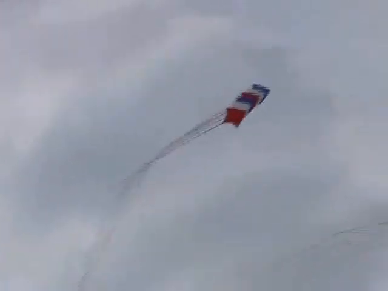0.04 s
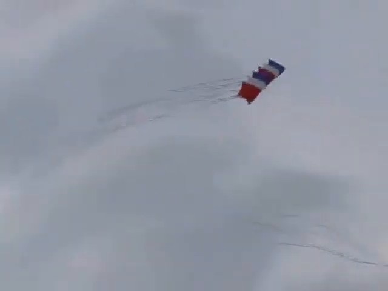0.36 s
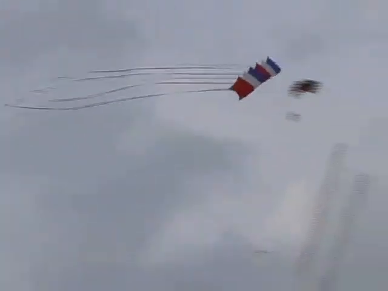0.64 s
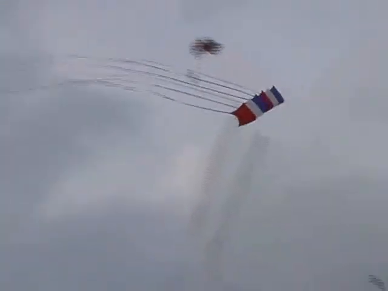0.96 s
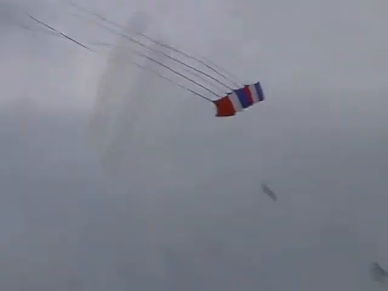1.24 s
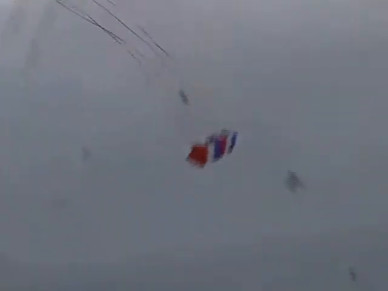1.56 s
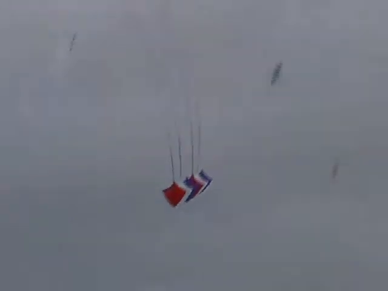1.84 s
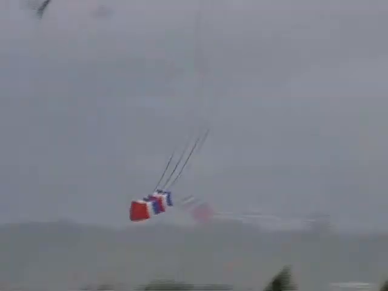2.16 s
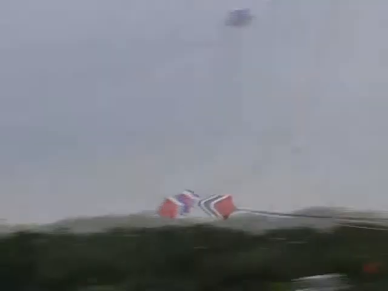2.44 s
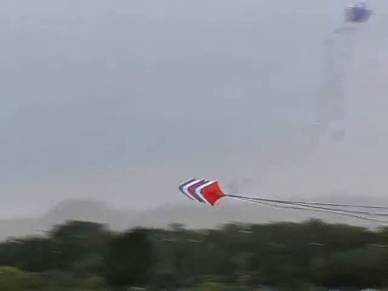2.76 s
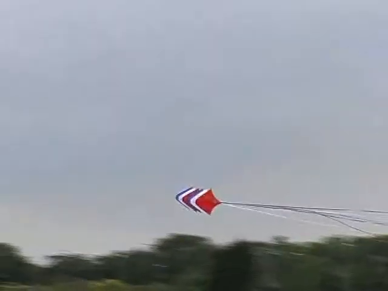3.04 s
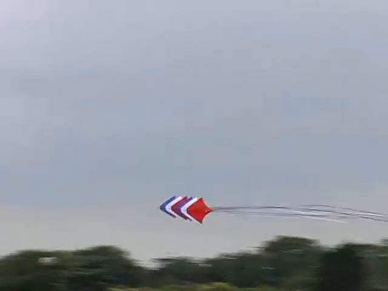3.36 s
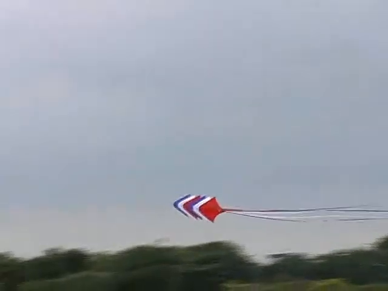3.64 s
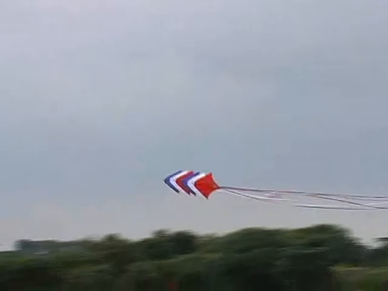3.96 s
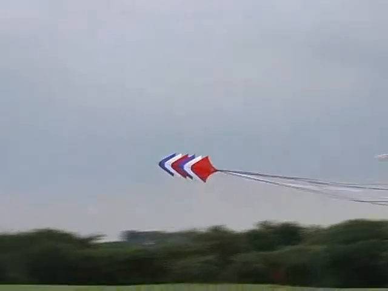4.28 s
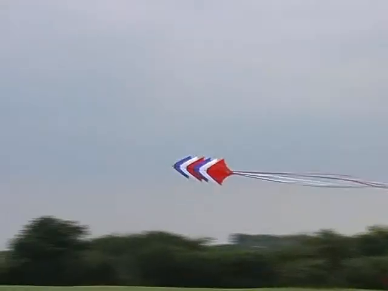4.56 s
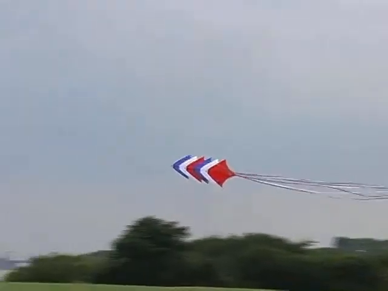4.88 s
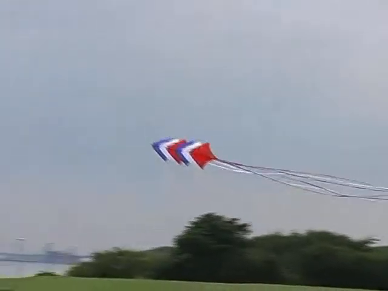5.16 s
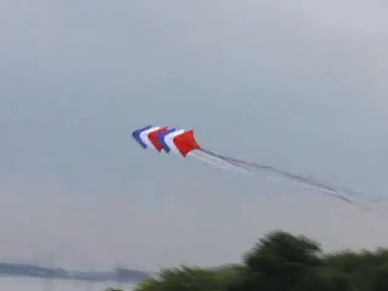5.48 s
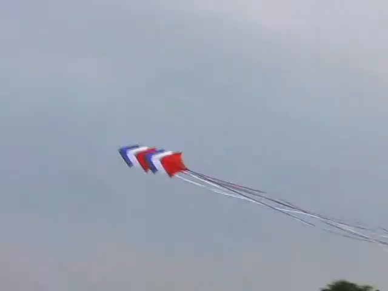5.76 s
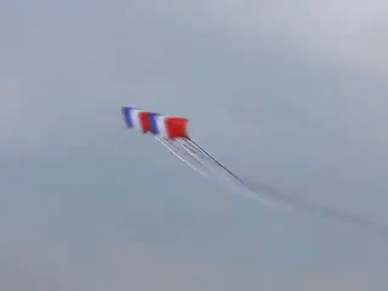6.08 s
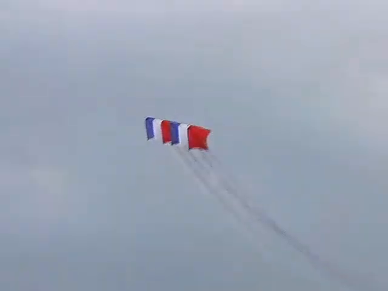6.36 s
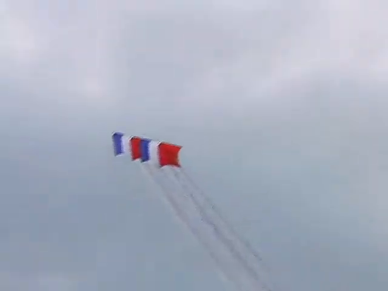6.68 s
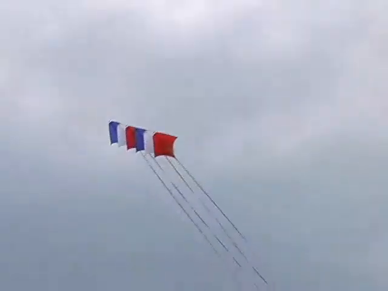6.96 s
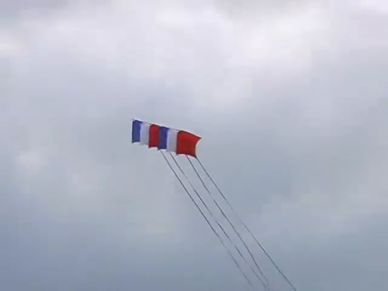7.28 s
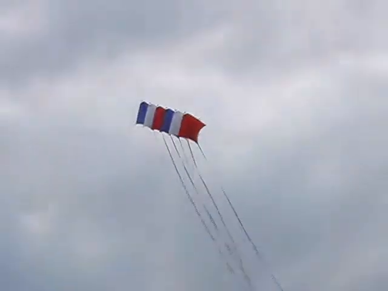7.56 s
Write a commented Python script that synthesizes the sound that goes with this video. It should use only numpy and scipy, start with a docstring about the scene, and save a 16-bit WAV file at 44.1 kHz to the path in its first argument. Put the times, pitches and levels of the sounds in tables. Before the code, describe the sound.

Stacked stunt kites flutter throughout over an open field: fast, uneven flapping of cloth within a rush of air, with a faint rustle of distant trees and grass behind. From the start to about 1.1 seconds, strong gusts rumble and thump on the microphone, hardest near 0.85 seconds; afterwards only light puffs return. The flutter swells and roughens around 1.4, 2.1, 3.2, 4.1 and 5.5 seconds, with brief edge hisses, small bright rips and a few short, high buzzes. Sharp little cracks of taut cloth come irregularly, thickest from 3 to 3.9 and from 5 to 5.8 seconds. From about 5.9 to 7 seconds, as the kites climb, a soft hollow whoosh glides down in pitch and the flutter takes on a sweeping tone. The flapping continues a little quieter to the end at 7.6 seconds, with light wind puffs around 7.2.

```python
"""Stunt kites over an open field.

Stacked kites swoop, their sails fluttering in fast, uneven flaps over a rush of air. Driven harder,
they get louder and rougher; now and then an edge hisses or the cloth cracks. The ground echo sweeps a
comb through the sound as they dive, skim the grass and climb. Early on strong gusts buffet the
microphone, later only light puffs."""
import sys
import numpy as np
from scipy import signal
from scipy.fft import rfft, irfft, next_fast_len
from scipy.io import wavfile
from scipy.ndimage import uniform_filter1d, map_coordinates

SR = 44100
rng = np.random.default_rng(int(sys.argv[2]) if len(sys.argv) > 2 else 0)


def materialize(psi):
    """Save the field psi as 16-bit PCM at rate SR to the path in sys.argv[1].

    A 1-D psi becomes a single channel; in a 2-D psi each row is a channel.
    """
    bounded = np.clip(np.atleast_2d(psi).T, -1, 1)
    quanta = np.round(bounded * 32767).astype(np.int16)
    wavfile.write(sys.argv[1], SR, quanta)


N = 336042
TIME = np.arange(N) / SR

# tone colour of the sails, in flutter and cracks alike: f/Hz, gain/dB
SAIL_COLOUR = [(100, -45), (250, -15.5), (450, -9.5), (700, -4.5), (950, -3.5), (1380, 1), (1800, -2),
               (2300, 1), (2850, -1.5), (3500, -10), (4700, -20), (7000, -28.5), (13000, -51.5)]


def from_db(db):
    """Decibels to amplitude."""
    return 10 ** (np.asarray(db) / 20)


def rms_one(x):
    """Scales a signal to rms 1."""
    return x / np.sqrt(np.mean(x ** 2) + 1e-20)


def evened(x, size=5000):
    """Holds the level at rms 1 over a window of size samples, keeping the grain."""
    power = np.mean(np.atleast_2d(x) ** 2, axis=0)
    return x / np.sqrt(uniform_filter1d(power, size) + 1e-12)


def in_time(rows):
    """The columns of an automation curve at every sample."""
    times, *columns = np.transpose(rows)
    return [np.interp(TIME, times, column) for column in columns]


def panned(x, pan_db):
    """Stereo, with the left pan_db above the right."""
    return x * from_db(np.array([[.5], [-.5]]) * pan_db)


def add(out, s, sound):
    """Mixes a short sound in at time s."""
    at = round(s * SR)
    out[..., at:at + sound.shape[-1]] += sound[..., :N - at]


def drift(rate_hz):
    """Smooth random wander with spread 1."""
    pole = np.exp(-80 * np.pi * rate_hz / SR)
    noise = rng.standard_normal(N // 40 + 2002)
    slow = signal.lfilter([1], [1, -2 * pole, pole * pole], noise)[2000:]
    return np.interp(np.arange(N) / 40, np.arange(len(slow)), rms_one(slow))


def swell_at(s, length_s):
    """Smooth rise and fall of power around time s."""
    return np.exp(-np.minimum((2 * (TIME - s) / length_s) ** 2, 20))


def filtered(x, hz, kind="low", order=2):
    """Gentle low-, high- or band-pass."""
    return signal.sosfilt(signal.butter(order, hz, kind, fs=SR, output="sos"), x + 1e-18)


def coloured(x, spectrum):
    """Minimum-phase EQ through points of f/Hz, gain/dB."""
    size = 2 * next_fast_len(N // 2 + SR // 10)
    hz, db = np.transpose(spectrum)
    grid_hz = np.maximum(np.arange(size // 2 + 1) * SR / size, 1)
    gain = from_db(np.interp(np.log(grid_hz), np.log(hz), db))
    cepstrum = irfft(np.log(gain))
    cepstrum[1:size // 2] *= 2
    cepstrum[size // 2 + 1:] = 0
    return irfft(rfft(x, size) * np.exp(rfft(cepstrum)), size)[..., :N]


def crackle(energy, decay_s):
    """Each impulse of energy lets go a tiny burst of noise."""
    power = signal.lfilter([1], [1, -np.exp(-1 / (decay_s * SR))], energy + 1e-18)
    return np.sqrt(power) * rng.standard_normal(N)


def kick(hz, rise_cycles):
    """A pressure kick that swells and dies within a few cycles."""
    cycles = np.arange(2500) / SR * hz
    swell = cycles / rise_cycles
    return swell * np.exp(1 - swell) * np.sin(2 * np.pi * cycles)


def field():
    """Wind in far trees and grass, from all sides."""
    # colour of the distant rustle: f/Hz, gain/dB
    colour = [(25, -22), (60, -36), (130, -13), (300, -14), (700, 15.5), (1400, 23), (2500, 15), (4500, 11),
              (6300, 18.5), (8500, -14), (11000, 9), (13500, -3)]
    rustle = rms_one(coloured(rng.standard_normal((2, N)), colour))
    return from_db(-52 + 0.86 * drift(1.3)) * rustle


def wind_level(attack_s=0.023, release_s=0.03, wander_db=4):
    """Each gust swells, holds and dies away over a light, wandering breeze; in dB."""
    # rumble between the gusts: t/s, level/dB
    breeze = [(0, -55), (2.2, -57.5), (2.8, -65), (3.4, -58), (4.6, -57.5), (5.4, -57.5), (6.2, -66),
              (6.8, -58), (7.62, -55.5)]
    # gusts on the microphone: start/s, hold/s, level/dB
    gusts = [(0, 0.0073, -30), (0.208, .08, -35.5), (0.301, 0.062, -28), (0.441, 0.045, -29),
             (0.505, 0.34, -26.5), (0.738, 0.037, -23), (0.838, 0.03, -22), (0.89, 0.025, -27.5),
             (1.019, 0.023, -30.5), (1.128, 0.016, -36.5), (1.2, 0.41, -54.5), (1.407, 0.022, -38),
             (1.88, 0.018, -43), (2.294, .01, -43), (2.46, .01, -48), (3.55, 0.032, -37.5),
             (4.576, 0.035, -47), (5.074, 0.05, -47), (7.092, 0.017, -37.5), (7.242, 0.024, -36.5),
             (7.303, 0.02, -38)]
    level = from_db(in_time(breeze)[0] + wander_db * drift(8.5))
    for s, hold_s, db in gusts:
        fade = np.maximum(s - TIME, 0) / attack_s + np.maximum(TIME - s - hold_s, 0) / release_s
        level = np.maximum(level, from_db(db) * np.exp(-np.minimum(fade, 20)))
    return 20 * np.log10(level)


def microphone_wind():
    """Lumpy turbulence, mostly its own at each microphone port; a harder gust is brighter."""
    # colour of the rumble at full force: f/Hz, gain/dB
    colour = [(15, -24), (30, -18), (55, -4.5), (110, -0.5), (165, -0.5), (260, -1.5), (400, -3.5),
              (750, -11), (1200, -20), (2500, -29), (6000, -88)]
    gust_db = wind_level()
    lumps = from_db(3.5 * np.clip([drift(60), drift(60)], -1.5, 1.5))
    eddies = (rng.standard_normal((2, N)) + 0.53 * rng.standard_normal(N)) * lumps
    rumble = evened(coloured(eddies, colour), size=1800)
    dull = filtered(rumble, 200, order=1)
    force = np.clip((gust_db + 44) / 18, 0, 1)
    return from_db(gust_db) * ((1 - force) * dull + force * rumble)


def buffets(half_length_cycles=0.82, wake_s=0.0099, port_lag_rad=0.52):
    """Eddies burst on the ports in short thumps; hard ones steepen, tear and leave a ragged wake."""
    # single eddies: peak t/s, level/dB, f/Hz, left minus right/dB
    eddies = [(.329, -11.5, 420, -2), (.36, -20, 420, 0), (.548, -13, 430, -3), (.572, -17, 480, 0),
              (.6025, -10, 332, 4), (.63, -18, 330, 5), (.662, -15.5, 380, 10), (0.677, -14.5, 406, -7),
              (.722, -14, 450, 5), (.747, -21, 384, 0), (.7708, -9, 250, -2), (.774, -14, 527, 1),
              (0.7847, -15, 450, -5), (.8398, -3, 410, 4.5), (0.8645, -14, 280, -3), (.897, -9.5, 425, -5),
              (.928, -22, 300, 0), (1.029, -18, 360, -4), (1.034, -18, 247, -7), (7.089, -27, 193, -14),
              (7.23, -31.5, 190, -10), (7.27, -32, 140, 4), (7.313, -33, 130, -6)]
    out = np.zeros((2, N))
    t = np.arange(-1300, 1300) / SR
    wake = (t > 0) * np.exp(-np.abs(t) / wake_s)
    lag = np.array([[.5], [-.5]]) * port_lag_rad  # an eddy reaches one port first
    for s, db, hz, pan_db in eddies:
        hardness = np.clip((db + 24) / 18, 0, 1)
        phase = 2 * np.pi * hz * t + lag
        envelope = np.exp(-(hz * t / half_length_cycles) ** 2)
        noise = filtered(rng.standard_normal(len(t)), [400, 1400], "band")
        tearing = np.sqrt(hardness) * np.tanh(rms_one(noise))
        overtones = .4 * np.sin(2 * phase) + .42 * np.sin(3 * phase)
        pressure = np.sin(phase) + hardness * envelope * overtones
        thump = envelope * pressure + (0.49 * envelope + 0.2 * wake) * tearing
        add(out, s + t[0], panned(from_db(db - 3) * thump, pan_db))
    return filtered(out, 1730)


def flutter(rate_hz, jitter, spread_db, flap_s, rush, sails, step_db=0):
    """Each sail whips its trailing edge at its own uneven rate, in surges, over a smooth rush of air."""
    energy = np.zeros(N)
    surge_db = 1.2 * np.clip(drift(44), -2, 2)
    for k in range(sails):
        flap_hz = rate_hz * .82 ** k * np.exp(.12 * drift(3) + jitter * drift(60))
        at = np.flatnonzero(np.diff(np.floor(np.cumsum(flap_hz) / SR)))  # one flap a cycle
        flap_db = spread_db * np.clip(rng.standard_normal(N)[at], -2, 2) + surge_db[at]
        energy[at] += from_db(flap_db - k * step_db) ** 2
    flaps = evened(crackle(energy, flap_s))
    return evened(flaps + rush * rng.standard_normal(N))


def swept_comb(x, sweep, dull_hz, microphone_height_m=1.6, sound_m_per_s=343):
    """Adds a dulled copy timed like a ground echo: the steeper the angle, the later it comes."""
    degrees, reflection = in_time(sweep)
    lag_s = 2 * microphone_height_m * np.sin(np.radians(degrees)) / sound_m_per_s
    echo = map_coordinates(x, [np.arange(N) - lag_s * SR], order=1)
    return x + reflection * filtered(echo, dull_hz)


def low_flutter():
    """A duller, lower layer of flutter with a sweeping hollow tone."""
    # colour of this layer: f/Hz, gain/dB
    colour = [(80, -27), (200, -7.5), (330, -4.5), (500, -2), (680, 2), (950, -3.5), (1400, -3),
              (2200, -3.5), (3500, -21.5), (9000, -40)]
    # hollow sweep: t/s, angle setting the delay/degrees, comb depth/ratio (negative flips polarity)
    sweep = [(0, 25, .1), (2.4, 9.2, .2), (3.3, 5.5, -.35), (4.2, 2.5, -.3), (5.55, 3.2, -.4),
             (6.2, 8.7, .3), (6.6, 9.6, .75), (6.95, 11.1, .9), (7.25, 13.6, .8), (7.62, 17.8, .7)]
    # fader ride: t/s, level/dB
    ride = [(0, -38), (2.05, -38.5), (2.8, -42.5), (3.9, -37.5), (4.4, -41), (5.55, -40), (5.9, -42.5),
            (6.4, -37), (7.62, -40)]
    flaps = flutter(70, jitter=.3, spread_db=3, flap_s=0.0015, rush=0.95, sails=2)
    hollow = swept_comb(coloured(flaps, colour), sweep, dull_hz=3300)
    return from_db(in_time(ride)[0]) * evened(hollow)


def whoosh(width_hz=200):
    """Two narrow bands of noise glide down as a hollow whoosh during the last climb."""
    # upper and lower band: t/s, f/Hz, level/dB
    upper = [(5.87, 2900, -75), (5.94, 2740, -45), (6.04, 2243, -45), (6.14, 2090, -57), (6.25, 2030, -40),
             (6.34, 1753, -58), (6.43, 1460, -42), (6.58, 1369, -46), (6.7, 1146, -59), (6.85, 1023, -51),
             (7, 957, -52), (7.12, 900, -75)]
    lower = [(5.85, 850, -63), (6.03, 780, -44), (6.25, 700, -45), (6.55, 670, -45.5), (6.8, 620, -60)]
    out = np.zeros(N)
    for glide in (upper, lower):
        hz, db = in_time(glide)
        phase = 2 * np.pi * np.cumsum(hz) / SR
        noise = filtered(rng.standard_normal((2, N)), width_hz / 2)
        out += from_db(db) * evened(noise[0] * np.cos(phase) + noise[1] * np.sin(phase))
    return out


def buzzes(ripple, width_octaves=0.33):
    """Pulled taut, the trailing edge rings in a narrow band with every ripple."""
    # taut moments: centre t/s, length/s, f/Hz, level/dB
    taut_moments = [(1.206, 0.063, 3000, -51), (1.57, 0.056, 3000, -43), (3.23, 0.11, 2660, -43.5),
                    (4.067, 0.051, 2420, -33), (4.366, 0.07, 2930, -43), (5.07, 0.078, 2870, -48),
                    (5.444, 0.067, 3080, -42), (5.56, 0.022, 2730, -31)]
    out = np.zeros(N)
    for s, length_s, hz, db in taut_moments:
        band_hz = hz * 2 ** (np.array([-.5, .5]) * width_octaves)
        ring = evened(filtered(ripple, band_hz, "band"))
        out += from_db(db) * np.sqrt(swell_at(s, length_s)) * ring
    return out


def snaps(drive_db, per_s=14, low_hz=1430, high_hz=3500):
    """Small snaps of the cloth at random moments, stronger as the sail is driven harder."""
    out = np.zeros(N)
    for when, size, pitch in rng.random((round(per_s * N / SR), 3)):
        at = int(when * (N - 1))
        hz = low_hz * (high_hz / low_hz) ** pitch
        db = drive_db[at] + 11.1 + 2.2 * size
        add(out, at / SR, from_db(db) * kick(hz, rise_cycles=0.4))
    return filtered(out, [700, 5500], "band")


def cracks(kick_db=-1, rustle_db=-1.5):
    """Now and then the cloth snaps taut: a sharp kick with a short rustling tail."""
    # cracks of a sail: t/s, level/dB, f/Hz
    hits = [(0.014, -32, 1700), (0.042, -36, 1900), (.093, -25, 1800), (0.7936, -13, 2010),
            (.8045, -15, 2200), (.8958, -17, 2500), (1.027, -17, 1900), (1.2338, -13, 2290),
            (1.3174, -21, 1900), (1.349, -27, 1700), (1.65, -17, 1700), (1.7912, -19, 2000),
            (1.9284, -18, 1600), (2.3105, -15.5, 1800), (3.057, -13.5, 2400), (3.1545, -14, 1780),
            (3.1643, -17, 2060), (3.2204, -13, 2340), (3.2774, -14, 2250), (3.403, -13, 1980),
            (3.43, -21, 1730), (3.503, -12, 2300), (3.554, -16, 2280), (3.6107, -17, 1900),
            (3.7105, -20, 1800), (3.7716, -23, 1800), (3.8367, -19.5, 1900), (3.88, -18, 2100),
            (4.1064, -17, 1900), (4.196, -14, 2300), (4.271, -13.5, 1610), (4.3847, -16, 2100),
            (4.5167, -19.5, 1900), (4.623, -20, 1640), (4.7832, -23, 1770), (4.926, -25, 1750),
            (5.0753, -14.5, 2220), (5.1016, -16, 1820), (5.1228, -18, 1800), (5.1385, -16, 2500),
            (5.225, -14.5, 2170), (5.2444, -14, 1900), (5.3268, -13, 1320), (5.357, -13, 1930),
            (5.3816, -11.5, 1900), (5.405, -16, 2000), (5.4288, -14, 1500), (5.447, -15.5, 1900),
            (5.5476, -13, 1900), (5.5538, -15, 1500), (5.56, -16, 2300), (5.6182, -16, 1900),
            (5.7166, -19, 1610), (5.764, -20, 1930), (5.831, -19, 2000), (6.31, -17, 1980),
            (6.4225, -13, 1900), (6.4255, -15, 1000), (6.4742, -20, 1600), (6.497, -18.5, 1600),
            (6.567, -13, 1250), (6.575, -16, 2300), (6.67, -16, 2040), (6.7765, -20, 1700),
            (6.834, -19, 1200), (6.941, -17, 1790), (6.976, -19, 2390), (6.9882, -18, 1650),
            (7.2023, -21, 2000), (7.2517, -16, 1800), (7.446, -19, 1550), (7.527, -21, 1800),
            (7.589, -23.5, 2000)]
    kicks, energy = np.zeros(N), np.zeros(N)
    for s, db, hz in hits:
        add(kicks, s + 0.000936, from_db(db + kick_db) * kick(hz, rise_cycles=0.44))
        energy[round(s * SR)] = from_db(db + rustle_db) ** 2
    rustle = coloured(crackle(energy, decay_s=.0016), SAIL_COLOUR)
    return filtered(kicks, 450, "high") + rustle  # the cracks carry no deep bass


def rips():
    """A whipped trailing edge gives a short, bright burst."""
    # crisp rips: t/s, level/dB
    hits = [(.6565, -30), (.8496, -30), (2.038, -28), (2.071, -32), (2.3114, -26.5), (3.553, -26),
            (3.6608, -26), (3.995, -24.5), (4.053, -29), (4.381, -31), (4.7962, -27.5), (5.1228, -31),
            (5.5683, -35), (6.575, -28), (7.3404, -31)]
    # their colour: f/Hz, gain/dB
    colour = [(1500, -18), (3500, 5), (6300, 3.5), (8500, -11), (13000, -23.5)]
    energy = np.zeros(N)
    for s, db in hits:
        energy[round(s * SR)] = from_db(db) ** 2
    return coloured(crackle(energy, decay_s=0.0031), colour)


def rasp_and_hiss(flaps, ripple, swing_db):
    """Cloth rasps and edges hiss with the flaps, rising with the drive and whenever an edge spills air."""
    # colours of the cloth's rasp and the edges' hiss: f/Hz, gain/dB
    rasp_colour = [(1200, -28), (2500, 10.5), (3200, 8), (4200, 5), (5000, 1.5), (5800, 3), (6800, -3.5),
                   (8500, -14.5), (13000, -45)]
    hiss_colour = [(3000, -14), (5500, -12.5), (7000, 11), (8500, 2.5), (11000, -7), (12200, -14.5),
                   (13500, -28)]
    # treble ride, duller while the kite skims the grass: t/s, gain/dB
    treble = [(0, 2), (.75, 2.5), (1.4, 1), (2.1, 1), (2.6, 1), (3.2, 1), (4.1, 2), (4.38, -0.5),
              (4.47, 0.5), (4.57, 0.5), (4.68, 0.5), (4.92, 0), (4.98, -3), (5.08, 0.5), (5.7, 0.5),
              (6.1, 0.5), (6.4, 0), (7.62, 2.5)]
    # spills of air: centre t/s, length/s, rasp level/dB, hiss level/dB
    spills = [(.72, 0.11, -34, -53), (1.302, 0.16, -40, -53), (1.765, 0.11, -40.5, -49),
              (2.064, 0.16, -34, -41.5), (2.345, 0.17, -39, -45), (2.985, 0.23, -36, -47.5),
              (3.535, 0.067, -35.5, -44), (3.665, 0.067, -40, -46), (3.79, 0.044, -39, -46.5),
              (4.017, 0.085, -32.5, -44), (5.41, 0.18, -42, -48), (5.69, 0.12, -40, -51),
              (6.398, 0.32, -40.5, -48.5), (6.874, 0.17, -39.5, -50.5)]
    treble_db, = in_time(treble)
    rasp_power = from_db(-39.5 + 0.69 * swing_db + treble_db) ** 2
    hiss_power = from_db(-50 + 0.6 * swing_db + treble_db) ** 2
    for s, length_s, rasp_db, hiss_db in spills:
        swell = swell_at(s, length_s)
        rasp_power += from_db(rasp_db) ** 2 * swell
        hiss_power += from_db(hiss_db) ** 2 * swell
    rasp = coloured(flaps + 1.41 * ripple + 0.56 * rng.standard_normal((2, N)), rasp_colour)
    hiss = coloured(flaps + 2.9 * ripple + 1.47 * rng.standard_normal((2, N)), hiss_colour)
    return np.sqrt(rasp_power) * evened(rasp), np.sqrt(hiss_power) * evened(hiss)


def sail_body(flaps, drive_db, shelf_hz=960):
    """The body of the flutter: flaps in the sail's colour, louder as the air drives them harder."""
    # low-mid shelf ride: t/s, gain/dB
    low_mids = [(0, 1.5), (1, -1), (1.45, 1), (2.3, 1.5), (3.4, -2), (3.8, -0.5), (4.15, -3.2),
                (4.55, -0.5), (5.2, -3.5), (5.5, -3), (5.8, 0.5), (6.4, 0), (7, 2.5), (7.62, 2)]
    sail = from_db(drive_db) * evened(coloured(flaps, SAIL_COLOUR))
    shelf_gain = from_db(in_time(low_mids)[0])
    return sail + (shelf_gain - 1) * filtered(sail, shelf_hz)


def kite_stack(cruise_db=-32, grass_hz=3720):
    """Air whips three stacked sails into flutter, rasp, hiss and cracks as they swoop."""
    # how hard the air drives the flutter: t/s, level/dB
    drive = [(0, -32.5), (.5, -33.5), (.75, -30.5), (1, -34), (1.4, -29), (1.87, -33), (2.1, -28.5),
             (2.36, -33.5), (2.57, -36.5), (3.22, -28.5), (3.6, -30.5), (3.82, -33), (4.07, -26.5),
             (4.33, -31), (4.44, -35.5), (4.54, -37), (4.7, -31), (5.29, -31.5), (5.43, -27.5),
             (5.56, -27.5), (5.65, -30), (6.03, -37.5), (6.45, -32.5), (6.75, -36), (7.62, -35.5)]
    # flight path: t/s, elevation/degrees, ground reflection/ratio (negative flips polarity)
    flight = [(0, 22, .2), (.55, 23.7, .25), (1.1, 21.4, .18), (1.5, 18, .15), (1.87, 13, .1),
              (2.1, 8.5, -.1), (2.33, 5.7, -.12), (2.55, 3.2, -.18), (3, 1.3, -.2), (4.2, 1.7, -.35),
              (4.85, 1.9, -.42), (5.3, 1.2, -.25), (5.5, 2.8, -.22), (5.75, 3.2, -.15), (5.88, 3.3, -.15),
              (5.97, 3.65, -.7), (6.07, 4.1, -.75), (6.25, 4.8, -.33), (6.5, 6.3, -.46), (6.75, 8.2, -.48),
              (7, 10.1, -.38), (7.25, 12.7, -.36), (7.62, 15.9, -.36)]
    # stereo position: t/s, left minus right/dB
    bearing = [(0, -1.5), (1.72, 1), (2.5, 0.5), (3.08, -2), (4.7, -2.5), (7.62, -1.5)]
    drive_db, = in_time(drive)
    swing_db = drive_db - cruise_db
    flap_hz = 80 * np.exp(-0.07 * swing_db)  # harder drive: sparser, rougher flaps
    flaps = flutter(flap_hz, jitter=.3, spread_db=2, flap_s=0.0017, rush=1, sails=3)
    flaps = swept_comb(flaps, flight, grass_hz)  # ground echo, its treble swallowed by the grass
    # small ripples run along the trailing edge on their own
    ripple = flutter(170, jitter=0.34, spread_db=3.5, flap_s=0.0019, rush=0.89, sails=2, step_db=4)
    rasp, hiss = rasp_and_hiss(flaps, ripple, swing_db)
    shake = from_db(.45 * drift(31))  # uneven air shakes the whole stack
    flicker = from_db(1.3 * drift(19))
    cloth = shake * (sail_body(flaps, drive_db) + rasp)
    transients = swept_comb(snaps(drive_db), flight, grass_hz) + cracks() + rips()
    kite = cloth + buzzes(ripple) + whoosh() + transients
    return panned(kite, in_time(bearing)[0]) + flicker * hiss


def scene():
    """Kites overhead, wind on the microphone, the field all around."""
    return kite_stack() + low_flutter() + microphone_wind() + buffets() + field()


def record(dry):
    """A steep high cut at 13550 Hz."""
    return signal.sosfilt(signal.ellip(12, .1, 80, 13550, fs=SR, output="sos"), dry)


dry = scene()
out = record(dry)
materialize(out)
```